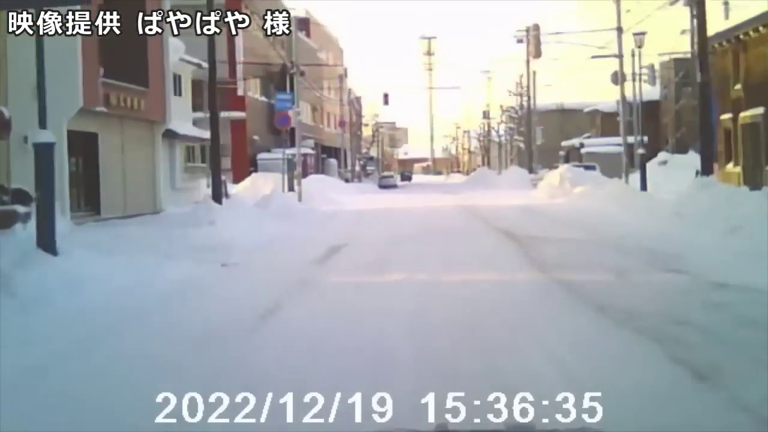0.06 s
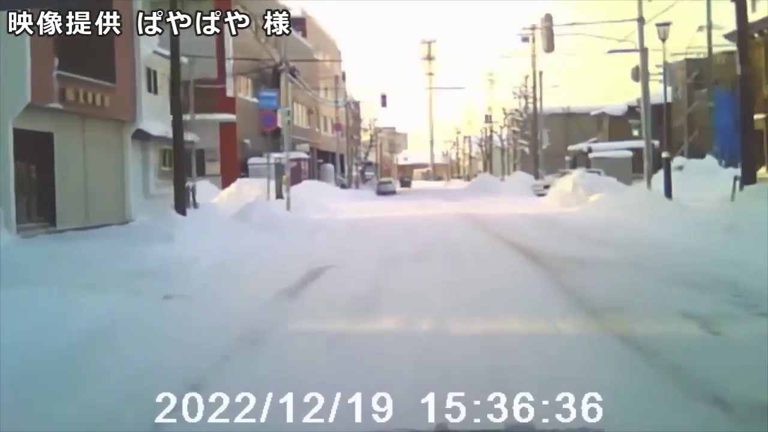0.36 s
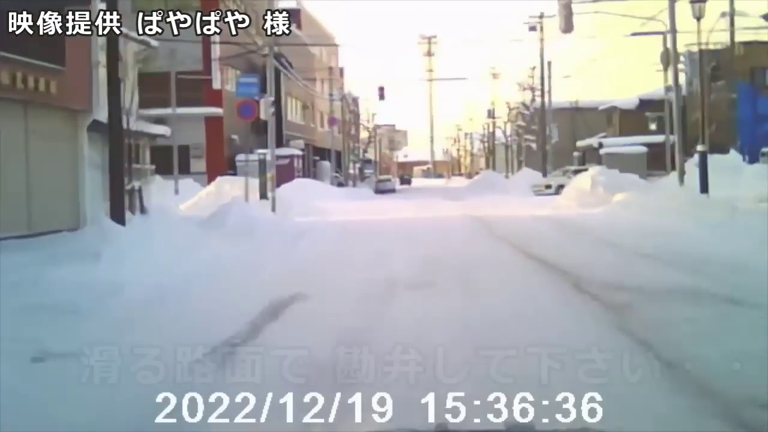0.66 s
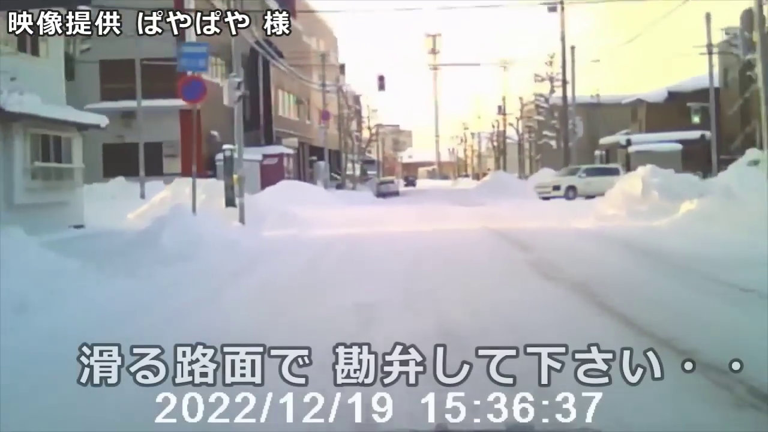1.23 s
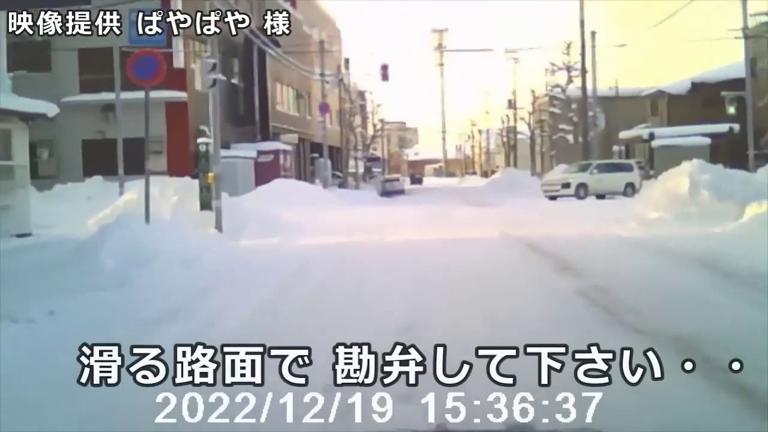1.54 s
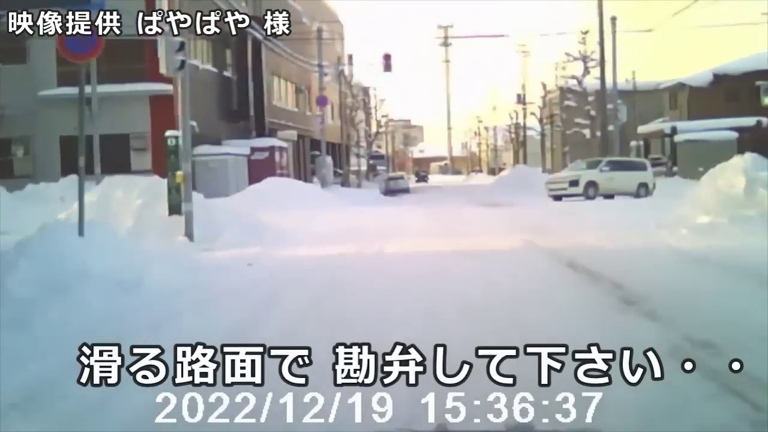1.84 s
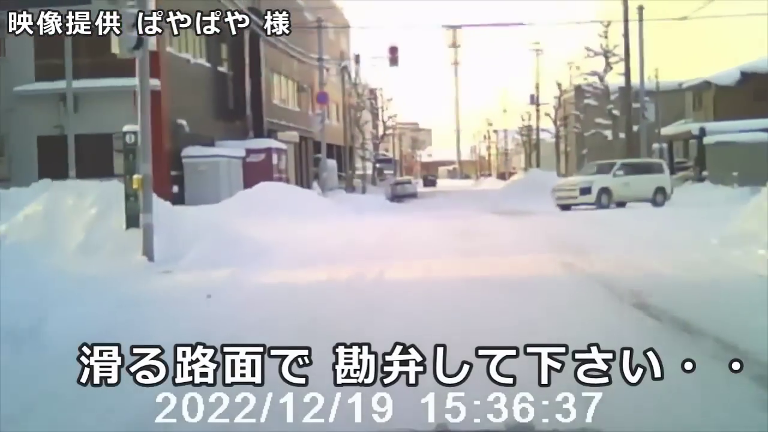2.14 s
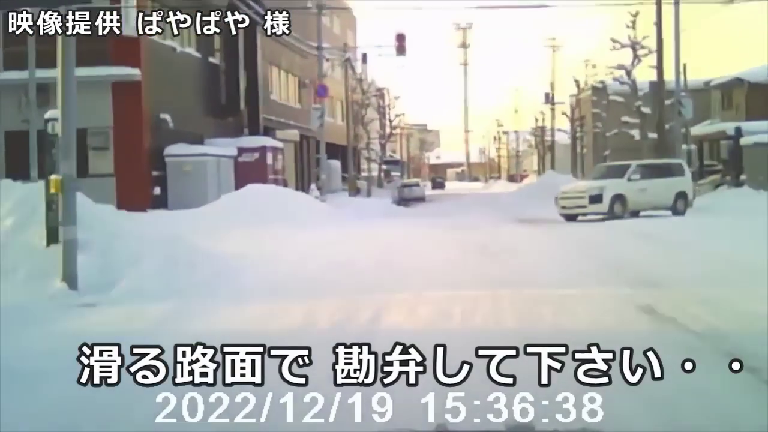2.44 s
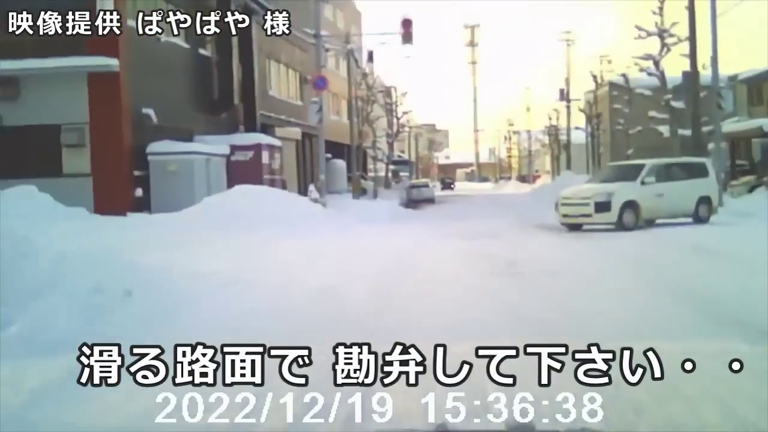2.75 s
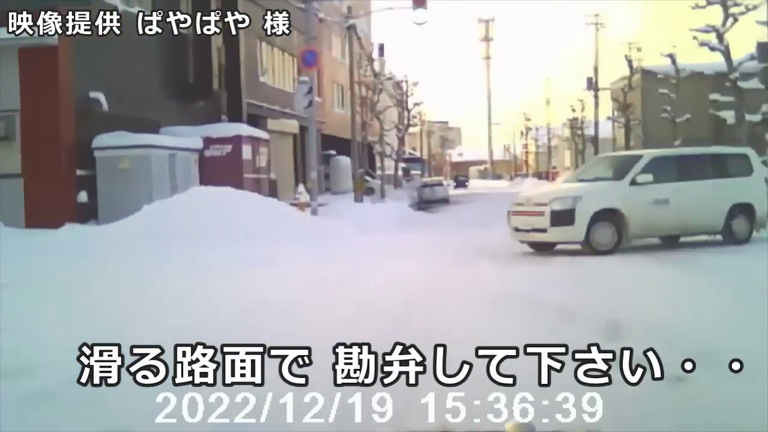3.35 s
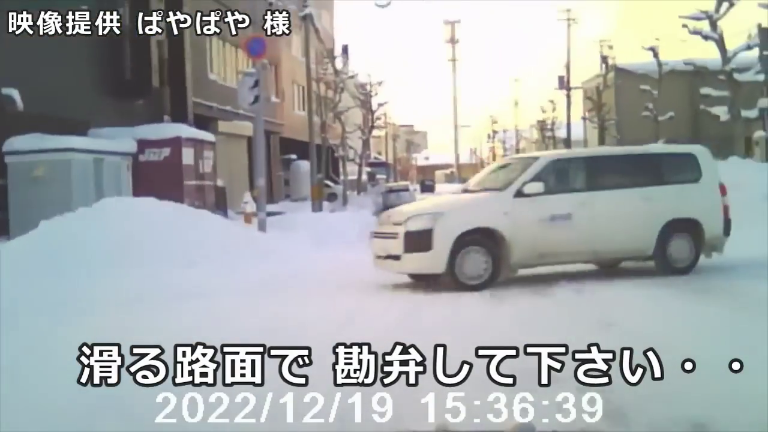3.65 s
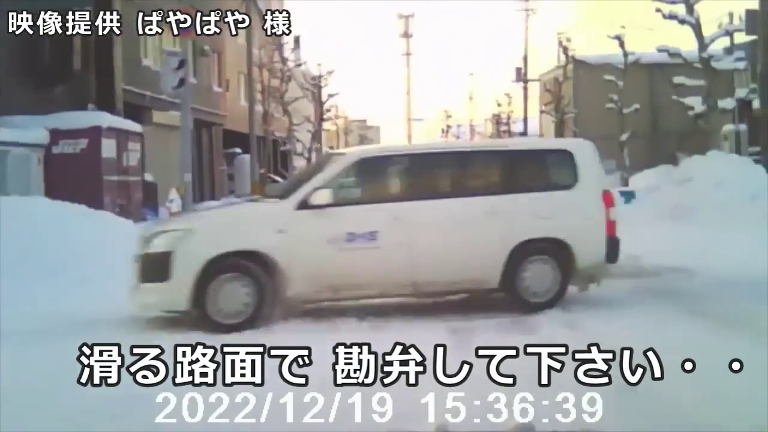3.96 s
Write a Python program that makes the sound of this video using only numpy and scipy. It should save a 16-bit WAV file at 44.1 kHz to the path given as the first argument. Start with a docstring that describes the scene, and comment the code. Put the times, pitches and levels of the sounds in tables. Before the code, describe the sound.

Loose plastic rattles and ticks close to a dashboard microphone inside a car on packed snow, over cabin boom and tyre drone. A heavy bump sets off the loudest rattle, then the brakes judder, tyres scrub and suspension knocks.

```python
"""Loose plastic rattles sharply inside a car braking on packed snow: ruts shake it into hard ticks and
short rings right next to a dashboard microphone. Underneath, the cabin booms and the tyres drone and rush.
After a heavy bump near 2.9 s the anti-lock brakes judder about 14 times a second, the tyres scrub and
the suspension knocks. The loudest peaks clip in the recorder, the treble is cut, and the overshoots
clip lightly again."""
import sys
import numpy as np
from scipy import signal
from scipy.fft import rfft, irfft, next_fast_len
from scipy.io import wavfile
from scipy.ndimage import uniform_filter1d, map_coordinates

SR = 44100
rng = np.random.default_rng(int(sys.argv[2]) if len(sys.argv) > 2 else 0)


def put_to_file(sound):
    """Save the sound as 16-bit audio at rate SR, in the file named by the first command-line argument."""
    columns = np.atleast_2d(sound).T  # one column per channel
    safe = np.clip(columns, -1, 1)
    whole_steps = np.round(safe * 32767)
    wavfile.write(sys.argv[1], SR, whole_steps.astype(np.int16))


N = 176400

# Fader moves for the beds. Each row: time in seconds, level in dB.
DRONE_FADER = [(0, -23), (.5, -23.5), (.9, -23), (1.3, -28), (1.9, -25.5), (2.4, -26), (2.9, -21),
               (3.3, -25), (4, -20.5)]
RUSH_FADER = [(0, -24), (.6, -25), (1.1, -25.5), (1.9, -25.5), (2.5, -24.5), (2.9, -23.5), (3.2, -21.5),
              (4, -21)]
BOOM_FADER = [(0, -15.5), (.9, -17.5), (1.6, -19), (2.2, -18), (2.6, -14), (3.3, -13), (4, -17)]
# Tone colours. Each row: frequency in Hz, relative level in dB.
DRONE_EQ = [(35, -27), (62, -0.5), (80, 1.5), (100, -0.5), (128, 0.5), (155, -7.5), (200, -13.5),
            (400, -49.5)]  # tyres through the floor
RUSH_EQ = [(90, -22), (160, -9), (195, -5), (230, -9), (300, -9.5), (380, -9.5), (428, -5), (480, -14),
           (700, -14.5), (830, -15), (950, -16), (1400, -21.5), (1750, -33), (2200, -41), (4000, -51.5)]  # tyres on snow, through the body
HISS_EQ = [(800, -13), (2100, -4), (2900, 4.5), (3550, 10), (4400, 1.5), (5300, 0), (6300, -6.5),
           (7200, -2.5)]  # fine hiss
BOOM_EQ = [(8, -26), (18, -18), (29, -9.5), (38, -2), (46, -7), (62, -22), (90, -48.5), (200, -77.5)]  # the cabin's low resonance
SCRUB_EQ = [(200, -17), (550, -14.5), (650, -8.5), (740, -1.5), (830, 1.5), (940, -5.5), (1100, -16),
            (1230, -13.5), (1420, -11), (1750, -28.5), (2300, -28), (5000, -40.5)]  # slipping tread
TICK_EQ = [(200, -6.5), (800, -1.5), (1400, 1), (2050, -16.5), (2550, -1), (3200, 2.5), (4000, -1),
           (4350, -2.5), (5150, -3.5), (5600, -6), (6800, -12.5), (7600, -17)]  # hard plastic contact
# Ruts that set the cabin booming. Each row: start in seconds, relative level in dB, pitch in Hz,
# T60 in seconds.
RUTS = [(1.772, 6.5, 38.5, 0.096), (1.973, -1, 34.2, 0.26), (2.268, 5, 35, 0.31), (2.733, -23, 32, 0.39),
        (2.918, 4.5, 35.4, 0.36)]
# Dull suspension knocks. Each row: start in seconds, relative level in dB.
KNOCKS = [(3.227, -7), (3.303, -10.5), (3.381, -2), (3.438, 1), (3.576, -9), (3.643, -5), (3.728, -8),
          (3.783, -6.5), (3.946, -9)]
# The ring of a knock. Each row: frequency in Hz, relative level in dB, T60 in seconds.
SUSPENSION_MODES = [(249, -14, 0.084), (476, -13, .05), (776, -6, .025), (842, -7.5, .035),
                    (1290, -17.5, 0.025)]
# Anti-lock brake strokes. Each row: start in seconds, relative judder and scrub levels in dB.
BRAKE_STROKES = [(2.944, -18.5, -21), (2.985, -27, -26), (3.054, -18.5, -20), (3.126, -10, -14.5),
                 (3.193, -11, -17), (3.287, -8.5, -17), (3.358, -10, -20), (3.428, -19, -19),
                 (3.46, -10, -35), (3.529, -12.5, -18.5), (3.571, -13.5, -17), (3.632, -8, -15.5),
                 (3.707, -9, -21.5), (3.771, -7, -19.5), (3.809, -15, -21), (3.903, -19, -20),
                 (3.934, -12, -22), (3.981, -17, -17.5)]
# Suspension and body resonances. Each row: centre in Hz, width in Hz, relative level in dB.
CHASSIS_MODES = [(114.6, 10.9, 6.5), (142.5, 12, -1), (215, 16, -5), (243.8, 15.3, 2.5), (285.6, 13, -3),
                 (352, 20, -6), (412, 43, -10), (466, 28, -4.5)]
# Hits of the loose plastic. Each row: start in seconds, relative ring and tick levels in dB, pitch in Hz.
PLASTIC_HITS = [(0.0174, -15.5, -14, 3540), (0.0336, -21, -22, 3520), (0.0391, -9.5, -19, 3410),
                (0.065, -16.5, -18, 3440), (0.099, -20.5, -19.5, 3510), (0.1046, -21, -44, 3620),
                (0.1579, -22, -29, 3300), (0.1836, -23.5, -41, 3300), (0.2516, -18, -14.5, 3510),
                (0.2666, -17.5, -25, 3410), (0.2844, -30, -16.5, 3530), (0.2997, -10, -20, 3500),
                (0.3096, -37, -28, 3540), (0.3164, -25, -20, 3530), (0.3297, -30, -23, 3400),
                (0.336, -12.5, -27, 3460), (0.3556, -29, -23, 3640), (0.4904, -27.5, -29.5, 3190),
                (0.5478, -19.5, -18.5, 3380), (0.5672, -27, -27, 3450), (0.5968, -34, -27, 3400),
                (0.6165, -29, -30.5, 3700), (0.8758, -32, -33, 3430), (1.233, -19, -25.5, 3300),
                (1.2478, -16, -25, 3440), (1.2619, -12, -43, 3540), (1.2691, -13.5, -36, 3560),
                (1.2948, -15.5, -19.5, 3470), (1.357, -24, -35, 3360), (1.3665, -22, -23.5, 3550),
                (1.3968, -21.5, -29, 3350), (1.4229, -30, -34, 3420), (1.65, -34, -41, 3540),
                (2.022, -31, -29.5, 3350), (2.2633, -28.5, -32, 3350), (2.2825, -22, -24.5, 3400),
                (2.289, -23.5, -47, 3420), (2.3478, -24.5, -36, 3400), (2.4058, -37, -21.5, 3580),
                (2.4172, -31, -24, 3460), (2.4694, -43, -22.5, 3660), (2.5423, -27, -22, 3330),
                (2.571, -17.5, -18.5, 3520), (2.5842, -42, -25.5, 3450), (2.6158, -13.5, -23, 3500),
                (2.633, -24, -43, 3520), (2.6999, -20, -20, 3430), (2.731, -39.5, -26, 3520),
                (2.7368, -27, -14, 3560), (2.792, -40, -20.5, 3300), (2.8122, -35, -22, 3350),
                (2.821, -25, -21.5, 3520), (2.8509, -12.5, -19.5, 3340), (2.931, -21.5, -24, 3510),
                (2.9474, -11, -22, 3590), (2.9716, -9.5, -15, 3510), (2.9884, -5, -9, 3470),
                (3.0017, -5, -25.5, 3420), (3.0154, -11, -11.5, 3430), (3.0222, -6.5, -7, 3290),
                (3.0355, -9.5, -12, 3620), (3.0556, -9, -17.5, 3360), (3.065, -5, -19, 3700),
                (3.085, -5, -7.5, 3460), (3.0987, -5.5, -12, 3690), (3.1186, -14.5, -21, 3350),
                (3.1335, -22.5, -24, 3520), (3.1763, -20.5, -34, 3460), (3.208, -23, -50, 3360),
                (3.2285, -25.5, -36, 3520), (3.25, -22.5, -44, 3450), (3.38, -23, -17.5, 3570),
                (3.3835, -17, -13, 3660), (3.5469, -9.5, -20, 3370), (3.5734, -20, -42, 3540),
                (3.6605, -22, -23.5, 3410), (3.7373, -23.5, -43, 3680), (3.878, -15.5, -23, 3580),
                (3.8836, -15, -19.5, 3660), (3.8918, -10.5, -36, 3560), (3.9049, -21.5, -50, 3590),
                (3.9383, -14.5, -32, 3300), (3.9492, -15.5, -36, 3130), (3.9602, -15, -12.5, 3370)]
# The plastic's ring around its main note. Each row: frequency in Hz, relative level in dB, T60 in seconds.
PLASTIC_MODES = [(1242, -18.5, 0.036), (1538, -20.5, 0.026), (2597, -16, 0.028), (3010, -20, 0.013),
                 (3840, -8.5, 0.019), (5224, -18.5, 0.012), (5840, -12.5, 0.0087), (6880, -21.5, .012)]


def amp(db):
    """Decibels to gain."""
    return 10 ** (np.asarray(db) / 20)


def unit(x):
    """Scale to rms 1."""
    return x / np.sqrt(np.mean(x ** 2) + 1e-20)


def eq_gain(eq, hz):
    """Gain of an EQ curve, read along a log frequency axis."""
    points_hz, points_db = np.transpose(eq)
    return amp(np.interp(np.log(hz + 1), np.log(points_hz + 1), points_db))


def fader(rows):
    """Fader moves as one dB value per sample."""
    return np.interp(np.arange(N) / SR, *np.transpose(rows))


def wobble(per_s):
    """A smooth random drift through per_s points a second."""
    return map_coordinates(rng.standard_normal(int(N * per_s / SR) + 4), [np.arange(N) * per_s / SR])


def filtered(x, response):
    """Filter x with a response given as a function of Hz."""
    size = next_fast_len(N + SR // 2)
    return irfft(rfft(x, size) * response(np.fft.rfftfreq(size, 1 / SR)), size)[:N]


def minimum_phase_eq(x, eq, size=2048):
    """Colour x without ringing ahead of its attacks."""
    cepstrum = irfft(np.log(eq_gain(eq, np.fft.rfftfreq(size, 1 / SR))))
    cepstrum[1:size // 2] *= 2
    cepstrum[size // 2 + 1:] = 0
    return signal.fftconvolve(x, irfft(np.exp(rfft(cepstrum))))[:N]


def noise(eq):
    """Coloured noise of rms 1."""
    return unit(filtered(rng.standard_normal(N), lambda hz: eq_gain(eq, hz)))


def decay(t, t60):
    """A tail that falls 60 dB in t60 seconds."""
    return np.exp(-np.log(1000) * t / t60)


def mode(t, hz, db, t60, phase_turns=0):
    """One resonance ringing out as a damped sine."""
    return amp(db) * decay(t, t60) * np.sin(2 * np.pi * (hz * t + phase_turns))


def add(out, start_s, sound):
    """Mix a sound in at start_s."""
    part = out[max(round(start_s * SR), 0):][:len(sound)]
    part += sound[:len(part)]


def steadied(x, window_s):
    """Level out the slow swells of a noise, leaving it at rms 1."""
    power = np.abs(uniform_filter1d(x ** 2, int(window_s * SR)))
    return unit(x / np.sqrt(power + 1e-9))


def road_bed():
    """Rolling tyres drone through the floor and rush through the body, over a thin hiss."""
    drone = amp(fader(DRONE_FADER)) * steadied(noise(DRONE_EQ), window_s=0.18)
    rush = amp(fader(RUSH_FADER) + 0.8 * wobble(per_s=14)) * noise(RUSH_EQ)
    hiss = amp(-43 + 0.87 * wobble(per_s=15)) * noise(HISS_EQ)
    return drone + rush + hiss


def cabin_boom(rise_s=0.031):
    """The cabin's lowest resonance booms throughout and swings out after each rut."""
    out = amp(fader(BOOM_FADER)) * steadied(noise(BOOM_EQ), window_s=0.19)
    t = np.arange(SR // 2) / SR
    attack = 1 - np.exp(-t / rise_s)
    for start, db, hz, t60 in RUTS:
        add(out, start, attack * mode(t, hz, db + 3.5, t60))
    return out


def suspension_knocks(trim_db=-2):
    """The suspension takes up its play with a dull knock as the wheels grab."""
    out, t = np.zeros(N), np.arange(SR // 8) / SR
    for start, knock_db in KNOCKS:
        for k, (hz, db, t60) in enumerate(SUSPENSION_MODES):
            level_db = knock_db + trim_db + db + 2 * rng.normal()
            add(out, start, (-1) ** k * mode(t, hz * rng.normal(1, 0.032), level_db, t60))
    return out


def tread_slips(per_s=900, spread_db=4.5):
    """The tread slips on the snow in a dense spray of tiny clicks."""
    clicks = (rng.random(N) < per_s / SR) * rng.choice([-1, 1], N)
    return clicks * amp(spread_db * rng.standard_normal(N))


def chassis_response(hz):
    """The chassis resonates as a bank of band-passes with alternating polarity."""
    return sum((-1) ** k * amp(db) * 1j * hz * width / (centre ** 2 - hz ** 2 + 1j * hz * width)
               for k, (centre, width, db) in enumerate(CHASSIS_MODES))


def anti_lock_brakes(rise_s=0.0097, hold_s=0.012, judder_trim_db=-1, scrub_trim_db=-2.5):
    """Every stroke of the anti-lock valve shakes the chassis and lets the tyres scrub."""
    judder_power, scrub_power, t = np.zeros(N), np.zeros(N), np.arange(SR // 4) / SR
    stroke = np.minimum(t / rise_s, 1) * decay(np.maximum(t - rise_s - hold_s, 0), t60=0.26)
    for start, judder_db, scrub_db in BRAKE_STROKES:
        add(judder_power, start, (amp(judder_db + judder_trim_db) * stroke) ** 2)
        add(scrub_power, start, (amp(scrub_db + scrub_trim_db) * stroke) ** 2)
    judder = steadied(filtered(tread_slips(), chassis_response), window_s=0.079)
    scrub = steadied(minimum_phase_eq(tread_slips(), SCRUB_EQ), window_s=0.034)
    return np.sqrt(judder_power) * judder + np.sqrt(scrub_power) * scrub


def dashboard_buzz(start_s=2.96, length_s=0.124, contacts_per_s=850, level_db=-22.5):
    """Small plastic contacts blur into a buzz while the heavy bump shakes the dashboard."""
    contacts = (rng.random(N) < contacts_per_s / SR) * rng.standard_normal(N)
    swell = np.sin(np.pi * np.clip((np.arange(N) / SR - start_s) / length_s, 0, 1))
    return amp(level_db) * swell * unit(minimum_phase_eq(contacts, TICK_EQ))


def plastic_ring(t, pitch_hz, main_t60_s=0.016, attack_s=0.001):
    """Struck plastic rings with a main note and side modes that vary from hit to hit."""
    modes = [(pitch_hz, 0, main_t60_s)]
    modes += [(hz * rng.normal(1, 0.02), db + 1.5 * rng.normal(), t60) for hz, db, t60 in PLASTIC_MODES]
    tone = sum(mode(t, hz, db, t60, phase_turns=rng.random()) for hz, db, t60 in modes)
    return tone * (1 - np.exp(-t / attack_s))


def plastic_tick(t):
    """A hard contact gives a sharp spike with a brief scattered tail."""
    tail = rng.standard_normal(len(t)) * decay(t, t60=0.022)
    spike = (t == 0) * rng.choice([-1, 1])
    return spike + amp(-1) * tail / np.linalg.norm(tail)


def plastic_rattles(ring_trim_db=10.5, tick_trim_db=30.5, bite_hz=5220):
    """Loose plastic grazes, hits with a tick and a ring, chatters once more and settles."""
    rings, ticks, t = np.zeros(N), np.zeros(N), np.arange(SR // 16) / SR
    for start, ring_db, tick_db, hz in PLASTIC_HITS:
        ring_gain, tick_gain = amp(ring_db + ring_trim_db), amp(tick_db + tick_trim_db)
        add(rings, start, ring_gain * plastic_ring(t, hz))
        chatter_at = start + 0.0025 * rng.uniform(0.494, 2)  # a weaker contact at another spot
        add(rings, chatter_at, ring_gain * amp(-5.5) * plastic_ring(t, hz * rng.normal(1, 0.021)))
        add(ticks, start, tick_gain * plastic_tick(t))
        bite_db = 1.466 * tick_db + 16  # a higher note that only hard hits bring out
        add(rings, start, mode(t, bite_hz * rng.normal(1, 0.02), bite_db, t60=0.0074))
        graze_at = start - 0.002 * rng.uniform(0.77, 2)  # the parts brush just before they hit
        add(ticks, graze_at, tick_gain * amp(-17) * plastic_tick(t))
        settle_at = start + 0.03 * rng.uniform(0.18, 1)  # a faint last tap
        add(ticks, settle_at, tick_gain * amp(-15.5 + 2.7 * rng.normal()) * plastic_tick(t))
    return rings + minimum_phase_eq(ticks, TICK_EQ)


def scene():
    """The mono mix at the dashboard microphone."""
    beds = cabin_boom() + road_bed()
    return (beds + plastic_rattles() + dashboard_buzz() + anti_lock_brakes() + suspension_knocks())[None]


def record(dry, input_ceiling=0.93, overshoot_ceiling=0.91, cutoff_hz=7110, top_hz=15800):
    """The loudest peaks clip in the recorder, the treble is cut, and the overshoots clip lightly again."""
    overloaded = np.clip(dry[0], -input_ceiling, input_ceiling)
    narrow = filtered(overloaded, lambda hz: 1 / np.sqrt(1 + (hz / cutoff_hz) ** 70))
    clipped = np.clip(narrow, -overshoot_ceiling, overshoot_ceiling)
    return filtered(clipped, lambda hz: np.clip((top_hz - hz) / 500 + 0.5, 0, 1))[None]


dry = scene()
out = record(dry)
put_to_file(out)
```